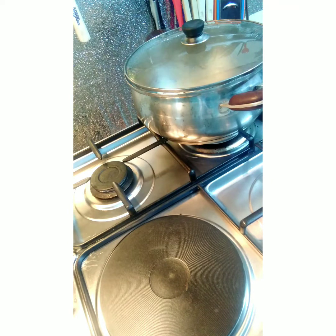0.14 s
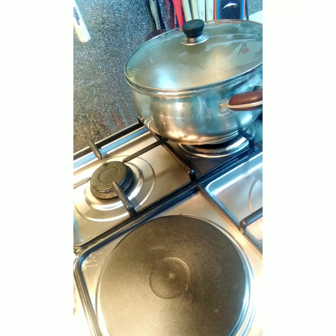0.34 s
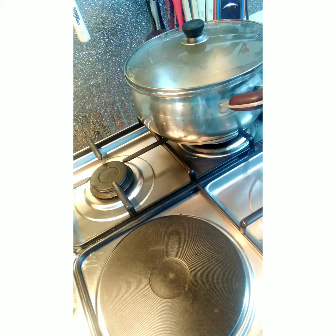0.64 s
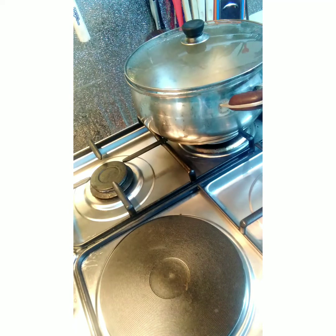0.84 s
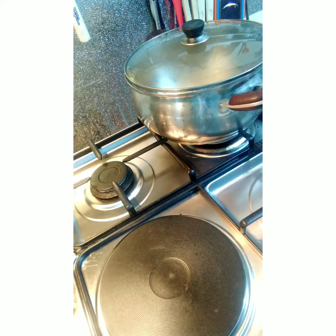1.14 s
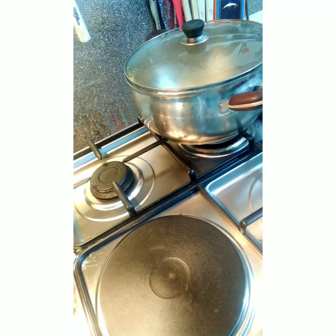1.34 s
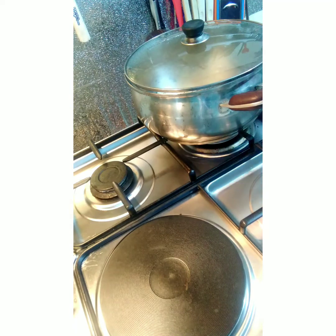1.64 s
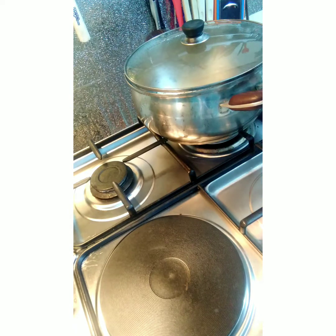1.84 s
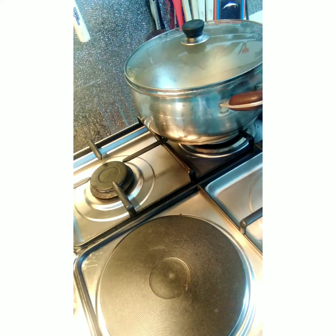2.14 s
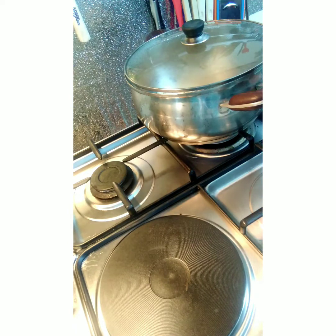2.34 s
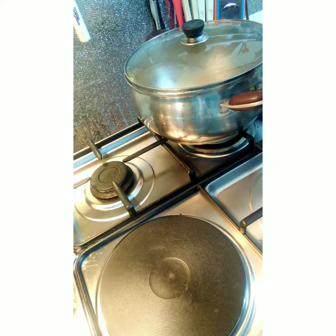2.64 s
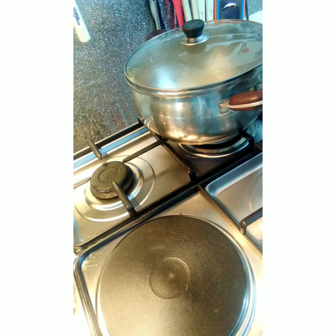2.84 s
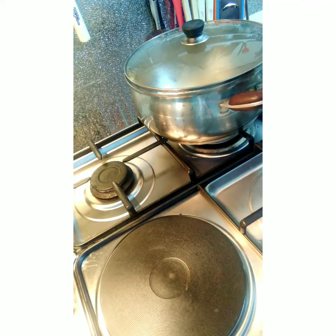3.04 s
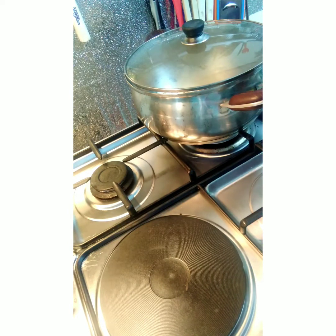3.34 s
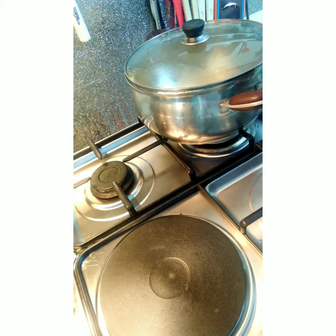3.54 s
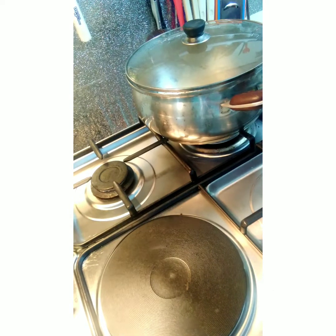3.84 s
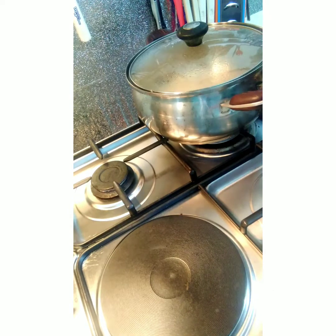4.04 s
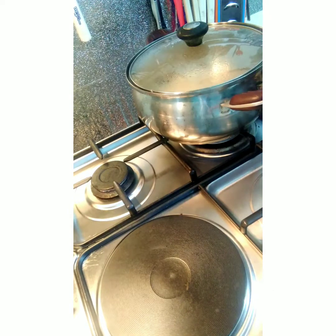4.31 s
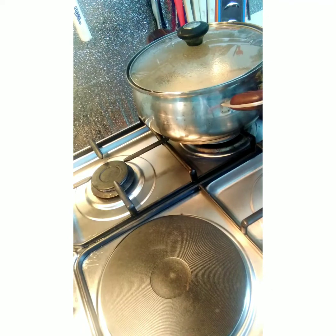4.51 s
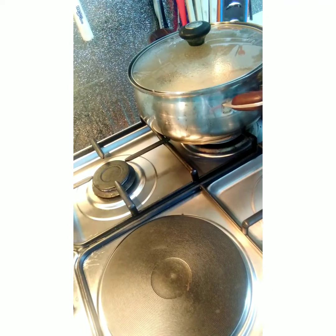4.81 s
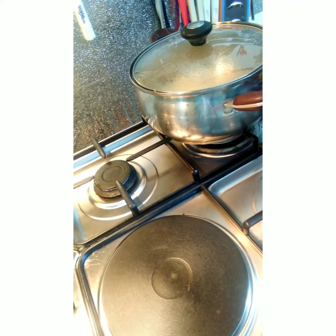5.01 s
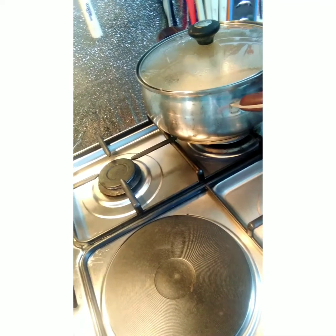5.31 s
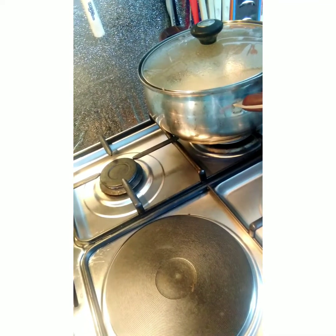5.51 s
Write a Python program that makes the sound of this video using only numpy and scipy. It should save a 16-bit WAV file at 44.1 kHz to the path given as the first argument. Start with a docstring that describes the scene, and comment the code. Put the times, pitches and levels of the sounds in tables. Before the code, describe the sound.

Scattered sharp popcorn pops ring a covered metal pot in a small kitchen, while a gas flame rushes and a hum drones.

```python
"""A small hard-walled kitchen: popcorn pops in a lidded steel pot on a gas hob.
Each hull tears with a short crackle that rings pot, lid and room, and steam thumps under the lid.
Flung kernels knock, land and tink against the metal. Underneath, the burner rushes and mains hum drones.
After a short silence the hum is louder and a fine hiss has joined."""
import sys
import numpy as np
from scipy import signal
from scipy.fft import rfft, irfft
from scipy.io import wavfile
from scipy.ndimage import uniform_filter1d

SR = 44100
rng = np.random.default_rng(int(sys.argv[2]) if len(sys.argv) > 2 else 0)


def pcm_store(signal):
    """Save signal as 16-bit PCM."""
    levels = np.round(np.clip(np.atleast_2d(signal), -1, 1) * 32767)
    wavfile.write(sys.argv[1], SR, levels.astype(np.int16).T)


N = 249833
TIME_S = np.arange(N) / SR
AGE_S = np.arange(SR // 2) / SR  # time since a blow
GAP_START_S, GAP_END_S = 3.809, 4.133  # the silence; "late" means after it

# band edges of a pop's knock, body, crack, snap and air (frequency [Hz])
POP_EDGES_HZ = [470, 1250, 2800, 5800, 9300, 16000]


def pops(burst_gain_db=-4.0):
    """Kernels pop, knock or land on the steel; steam thumps; some ring the pot wall."""
    # pops, dull knocks and faint landings (time [s], tear or contact [ms], relative level [dB],
    # tilt [dB/octave], thump re level [dB], wall ring [0-1])
    kernels = [(0.0586, 23.5, -17, -1.94, -12, 0.11), (0.2355, 2.3, -23, -1.5, -19.5, 0.12),
               (0.2492, 1, -24, -4.5, -8.5, 0.23), (.302, 3.5, -36.5, -8, -2, 0.17),
               (.3085, 4.8, -16.5, 0, -30.5, 0.11), (0.502, 7, -52, -4.5, -23, 0.02),
               (2.1859, 10.7, -32, 0, -18, 0.06), (2.223, 1.8, -37, -3, -17, 0),
               (2.3, 11.5, -39.5, -3.5, -20, 0.05), (2.344, 43, -45.5, -4.5, -11, 0),
               (2.384, 5, -11, -1.7, -14.5, 0.06), (2.673, 3.4, -31, -1.5, -27, 0.08),
               (2.7206, 3.4, -16, 2.4, -31.5, 0.02), (2.76, 1.7, -28.5, -6.5, -18, 0.1),
               (2.786, 2, -42, -8, -2.5, 0.17), (2.806, 3.5, -35, -1.5, -28, 0),
               (2.891, 4.7, -38, -1.5, -16, 0), (2.947, 2, -41.5, 1.5, -10, 0.02),
               (2.9758, 1.5, -22, -1.5, -5.5, 0), (3, 4.8, -33.5, -10.5, -36, 0.2),
               (3.516, 28, -34, -4, -10, 0.2), (3.565, 7.2, -39, -8, -5.5, 0.23),
               (5.135, 4.3, -48, 10, -33, 0), (5.25, 11, -31.5, 0.5, 0, 0.3),
               (5.2849, 5.1, -21, 0, -3, 0.21), (5.391, 2.8, -36.5, -4.5, 10.5, 0.13),
               (5.4109, 1.9, -24.5, -1, 1.5, 0.22)]
    out = np.zeros(N)
    for start_s, hold_ms, db, tilt, thump_db, ring in kernels:
        thump_hz, wall_hz = (146.4, 1000) if start_s > GAP_END_S else (239, 970)
        hold_s = hold_ms / 1000
        envelope = blow_envelope(hold_s)
        burst = pot(crackle() * envelope, start_s)
        bands = zip(POP_EDGES_HZ, POP_EDGES_HZ[1:], hull_tone(start_s, db, tilt))
        hull = sum(blow_level(band(burst, lo_hz, hi_hz, order=6), band_db, envelope)
                   for lo_hz, hi_hz, band_db in bands)
        steam = undb(thump_db) * steam_thump(thump_hz, hold_s)
        wall = ring * wall_ring(wall_hz)
        add(out, start_s, undb(db) * (undb(burst_gain_db) * (hull + steam) + wall))
    return out


def hull_tone(start_s, db, tilt_db_per_octave, pivot_hz=4030, late_air_db=5, weak_db=-33.5):
    """Band gains [dB]: one tone, tilted. Faint landings have less top treble, late events more."""
    # knock, body, crack, snap, air (gain [dB])
    hull_db = [-22.5, -8.5, -3.5, 3, -6.5]
    centres_hz = np.sqrt(np.multiply(POP_EDGES_HZ[:-1], POP_EDGES_HZ[1:]))
    bands_db = hull_db + tilt_db_per_octave * np.log2(centres_hz / pivot_hz)
    bands_db[-1] += late_air_db * (start_s > GAP_END_S) - 0.8 * max(weak_db - db, 0)
    return bands_db


def crackle(depth_db=2.5, t60_s=0.043):
    """Grainy early reflections blur into smooth noise."""
    grains = np.repeat(rng.standard_normal(len(AGE_S) // 25), 25)
    spread_db = depth_db * fade(AGE_S, t60_s)
    grain_rms = np.exp((spread_db * np.log(10) / 20) ** 2)
    return rng.standard_normal(len(AGE_S)) * undb(spread_db * grains) / grain_rms


def pot(x, start_s, direct_db=-12, crack_db=-9, crack_t60_s=0.047, late_tuning=1.025):
    """Pot and lid resonate after the first sharp crack, slightly higher after the silence."""
    # pot and lid modes (frequency [Hz], width [Hz], gain [dB])
    modes = [(684, 36, -4), (975, 36, -2), (1553, 24, 4), (1674, 20, -1), (1998, 42, 2), (2382, 38, 2),
             (2663, 30, 1), (2860, 36, -5), (3019, 14, -3), (3185, 28, 1), (3302, 26, -1), (3472, 30, -5),
             (3780, 60, 0), (4160, 50, -5), (4358, 48, 2), (4640, 100, -3), (4990, 90, -3), (5183, 22, -1),
             (5530, 38, 2), (5900, 60, -2), (6290, 110, -2), (6620, 60, -1), (7000, 70, -2), (7433, 45, -1),
             (7715, 60, 0), (8020, 90, -2), (8350, 150, 0), (8872, 45, 1)]
    # colour of the covered pot (frequency [Hz], gain [dB])
    pot_colour = [(70, -6.5), (150, 7.5), (300, -9.5), (420, -9.5), (680, -11), (1250, -6.5), (1700, -3),
                  (3300, 4), (5500, 5.5), (8400, 1), (9600, 8.5), (12000, -8), (15500, -18)]
    size = 2 * len(x)
    bins_hz = np.fft.rfftfreq(size, 1 / SR) / (late_tuning if start_s > GAP_END_S else 1)
    spots_db = 2 * rng.standard_normal(len(modes))  # the kernel's position weights each mode
    response = sum(undb(db + spot_db) / (1 + 2j * (bins_hz - hz) / width_hz)
                   for (hz, width_hz, db), spot_db in zip(modes, spots_db))
    direct = x * (undb(direct_db) + undb(crack_db) * fade(AGE_S, crack_t60_s))
    spectrum = rfft(x, size) * response + rfft(direct, size)
    return colour(irfft(spectrum), pot_colour)[:len(x)]


def steam_thump(hz, hold_s):
    """Steam pushes the air under the lid: a few low cycles over a short rumble."""
    envelope = blow_envelope(hold_s, pot_t60_s=0.14)
    cycles = np.sin(2 * np.pi * hz * AGE_S) * fade(AGE_S, t60_s=0.032)
    push = band(cycles, lo_hz=85, hi_hz=550, order=2)
    rumble = band(crackle() * envelope, hz / 1.5, hz * 1.5, order=3)
    return blow_level(level(push, 0) + level(rumble, 0), 0, envelope)


def wall_ring(hz, split_hz=17, upper_db=-7, t60_s=0.22):
    """The pot is not quite round, so its wall rings near 1 kHz as a beating pair."""
    lower = np.sin(2 * np.pi * hz * AGE_S)
    upper = np.sin(2 * np.pi * ((hz + split_hz) * AGE_S + rng.random()))
    return (lower + undb(upper_db) * upper) * fade(AGE_S, t60_s)


def tinks(ring_hz=3019, t60_s=0.24):
    """Hard kernels wake narrow groups of pot modes; the two lower tinks ring on cleanly near 3 kHz."""
    # strikes (time [s], contact [ms], level [dB], clatter centre [Hz], width [Hz], ring re clatter [dB])
    strikes = [(0.359, 6.2, -19, 7470, 2500, -46), (3.027, 2.3, -35.5, 3097, 650, 5.5),
               (3.5679, 1.2, -29.5, 3250, 609, -1)]
    out = np.zeros(N)
    ring = np.sin(2 * np.pi * ring_hz * AGE_S) * fade(AGE_S, t60_s)
    for start_s, contact_ms, db, hz, width_hz, ring_db in strikes:
        envelope = blow_envelope(contact_ms / 1000, pot_t60_s=0.083, tail_t60_s=t60_s,
                                 tail_share=0.25, onset_s=0.00041)
        strike = pot(crackle() * envelope, start_s, crack_db=1.0)
        clatter = band(strike, hz - width_hz / 2, hz + width_hz / 2, order=3)
        add(out, start_s, blow_level(level(clatter, 0) + level(ring, ring_db), db, envelope))
    return out


def lid_tap(start_s=2.063, contact_s=0.00205, tap_db=-44.5):
    """A kernel touches the lid, whose few modes ring softly."""
    # lid modes (frequency [Hz], nominal width [Hz], level re tap [dB])
    modes = [(1620, 300, 0), (2797, 203, -7.5), (3970, 495, -11.5), (8260, 634, -10)]
    out = np.zeros(N)
    envelope = blow_envelope(contact_s, pot_t60_s=0.075, tail_t60_s=0.27, tail_share=0.4)
    for hz, width_hz, db in modes:
        ring = resonate(crackle() * envelope, hz, width_hz)
        add(out, start_s, blow_level(ring, tap_db + db, envelope))
    return out


def burner(rush_db=-63, hollow_db=-58, hiss_db=-55, late_hollow_db=-60):
    """The gas flame rushes through the hollows under the pot; after the silence it hisses more."""
    # flame spectra, early and late (frequency [Hz], gain [dB])
    rush_colour = [(25, -17.5), (45, -5), (75, -13.5), (150, -6.5), (270, 5), (400, -6.5), (720, -0.5),
                   (980, -26.5), (1400, -20), (2200, -31.5), (3500, -33.5), (6500, -31.5), (8500, -26),
                   (14000, -60)]
    hiss_colour = [(25, -10), (100, 5.5), (220, 5.5), (400, -4.5), (620, 1), (1150, -12), (2000, -10),
                   (2600, -59.5), (5300, -39), (6800, -21), (7700, -10.5), (8700, -9.5), (9900, -37),
                   (15000, -65)]
    # modes of the hollows, early and late (frequency [Hz], nominal width [Hz], gain [dB])
    rush_modes = [(242, 41, -5.5), (466, 13, -1), (581, 15, 7), (636, 46, 3.5), (760, 77, -4),
                  (1202, 58, -10.5), (1597, 41, -8.5), (1747, 110, -8), (2115, 110, -12.5),
                  (2553, 110, -14), (2880, 40, -16.5), (2900, 240, -27), (3260, 37, -25), (3690, 31, -22),
                  (4280, 95, -14.5), (4610, 49, -25.5), (5270, 85, -25), (7180, 90, -27.5)]
    hiss_modes = [(441, 13, -0.5), (609, 13, 7), (760, 53, -6.5), (850, 16, -7), (1035, 81, -3.5),
                  (1210, 110, -4.5), (1880, 630, -15), (2320, 57, -13), (3050, 460, -15.5), (3740, 29, -18),
                  (4330, 260, -17.5), (5520, 170, -23.5), (6150, 120, -15)]
    noise = rng.standard_normal(N)
    early = level(colour(noise, rush_colour), rush_db)
    early += level(hollows(rush_modes, spit_db=27), hollow_db)
    late = level(colour(noise, hiss_colour), hiss_db)
    late += level(hollows(hiss_modes, spit_db=6), late_hollow_db)
    return np.where(TIME_S < GAP_START_S, early, late * swell(depth_db=5.75))


def hollows(modes, spit_db, spits_per_s=3, flutter_db=2.5):
    """Flame-driven resonances, each fluttering alone; spits of oil tick in the high ones."""
    out = np.zeros(N)
    for hz, width_hz, db in modes:
        spits = (rng.random(N) < spits_per_s / SR) * undb(spit_db) * min(hz / 4000, 1)
        gain = undb(db + flutter_db * drift(rate_hz=18))
        out += gain * resonate(rng.standard_normal(N) + spits, hz, width_hz * 1.4)
    return out


def mains_hum(hz=120.9, early_db=-64, late_db=-43.5, waver_db=0.9, waver_hz=0.99):
    """A wavering drone at twice the mains frequency, louder after the silence."""
    phase = 2 * np.pi * np.cumsum(hz + waver_hz * drift(rate_hz=30)) / SR
    gain = np.where(TIME_S < GAP_START_S, undb(early_db), undb(late_db) * swell(depth_db=11.5))
    return np.sqrt(2) * np.sin(phase) * gain * undb(waver_db * drift(rate_hz=19))


def swell(depth_db, tau_s=0.1):
    """Gain of the background rising back after the silence."""
    return undb(-depth_db * np.exp(-np.maximum(TIME_S - GAP_END_S, 0) / tau_s))


def blow_envelope(hold_s, pot_t60_s=0.13, tail_t60_s=0.34, tail_share=0.14, onset_s=0.0022):
    """Held during tear or contact, then a fast fall in the pot and the kitchen's slower tail."""
    age_s = np.maximum(AGE_S - hold_s, 0)
    power = (1 - tail_share) * fade(age_s, pot_t60_s) ** 2 + tail_share * fade(age_s, tail_t60_s) ** 2
    return (1 - np.exp(-AGE_S / onset_s)) * np.sqrt(power)


def blow_level(x, db, envelope):
    """Scale a decaying sound to start near db."""
    return level(x, db) * np.sqrt(np.mean(envelope ** 2))


def undb(db):
    """Decibels to gain."""
    return 10 ** (np.asarray(db) / 20)


def level(x, db):
    """Set the rms level."""
    return x * undb(db) / np.sqrt(np.mean(x ** 2))


def fade(age_s, t60_s):
    """Exponential decay, 60 dB down at t60_s."""
    return np.exp(-np.log(1000) * age_s / t60_s)


def colour(x, points):
    """Filter by (frequency [Hz], gain [dB]) points."""
    hz, db = np.transpose(points)
    bins_hz = np.maximum(np.fft.rfftfreq(len(x), 1 / SR), 1)
    return irfft(rfft(x) * undb(np.interp(np.log(bins_hz), np.log(hz), db)), len(x))


def band(x, lo_hz, hi_hz, order):
    """Causal band-pass."""
    return signal.sosfilt(signal.butter(order, [lo_hz, hi_hz], "band", fs=SR, output="sos"), x)


def resonate(x, hz, width_hz):
    """A resonance applied twice, for steep skirts."""
    b, a = signal.iirpeak(hz, hz / width_hz, fs=SR)
    return signal.lfilter(b, a, signal.lfilter(b, a, x))


def drift(rate_hz):
    """Smooth random drift, unit rms."""
    size = int(SR / rate_hz)
    steps = np.repeat(rng.standard_normal(N // size + 1), size)[:N]
    return level(uniform_filter1d(uniform_filter1d(steps, size), size), 0)


def add(out, start_s, sound):
    """Mix a sound in at start_s."""
    start = int(start_s * SR)
    out[start:start + len(sound)] += sound[:N - start]


def scene():
    """Pot, burner and hum, all centred."""
    return np.tile(pops() + tinks() + lid_tap() + burner() + mains_hum(), (2, 1))


def record(dry, top_hz=15700):
    """The sound breaks off briefly; the top treble is cut."""
    live = (TIME_S < GAP_START_S) | (TIME_S > GAP_END_S)
    return signal.sosfilt(signal.ellip(8, 0.2, 80, top_hz, fs=SR, output="sos"), dry * live)


dry = scene()
out = record(dry)
pcm_store(out)
```